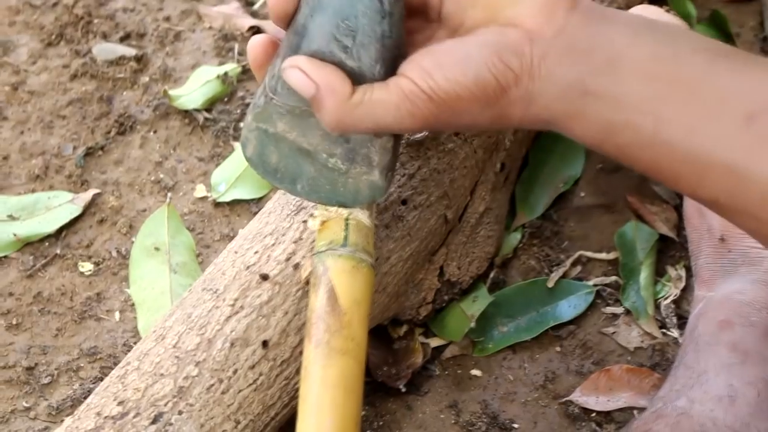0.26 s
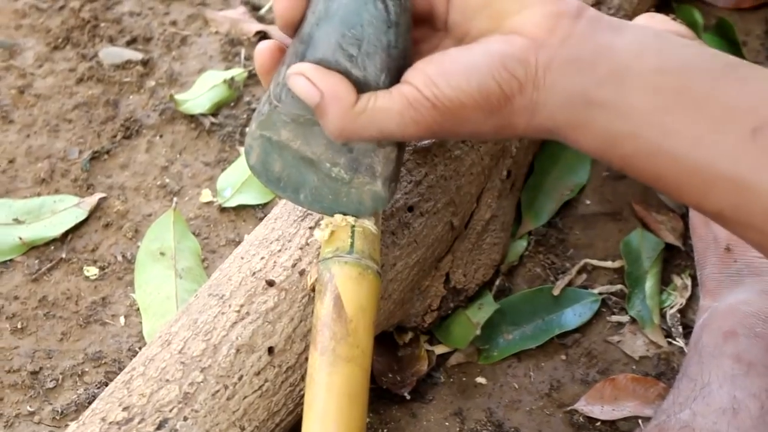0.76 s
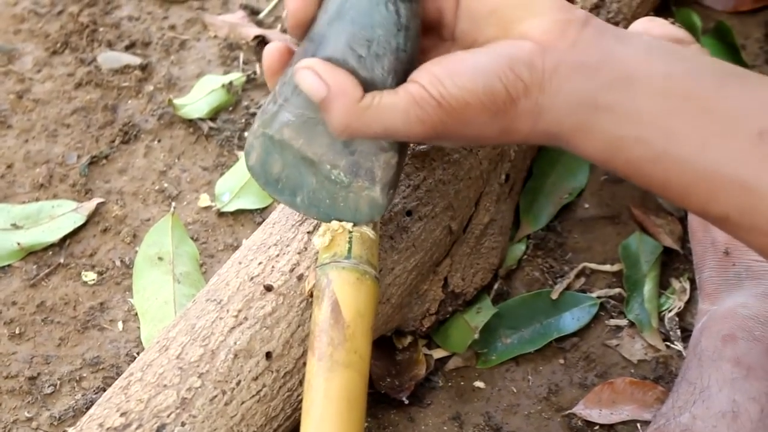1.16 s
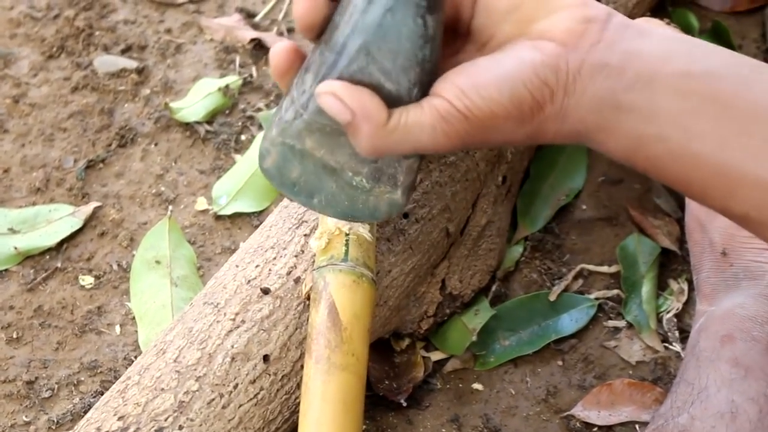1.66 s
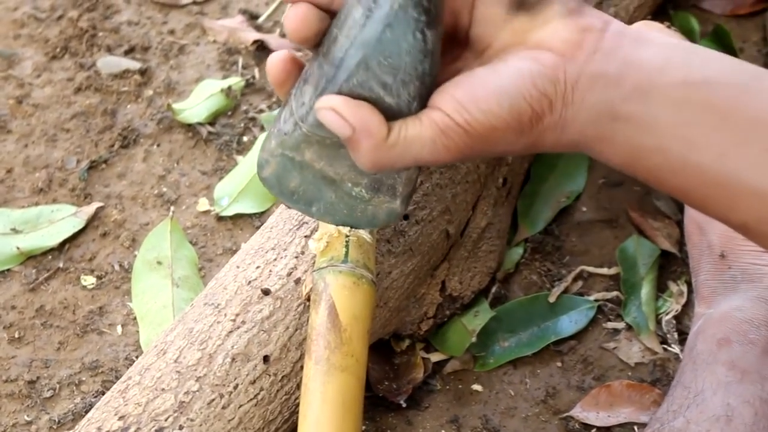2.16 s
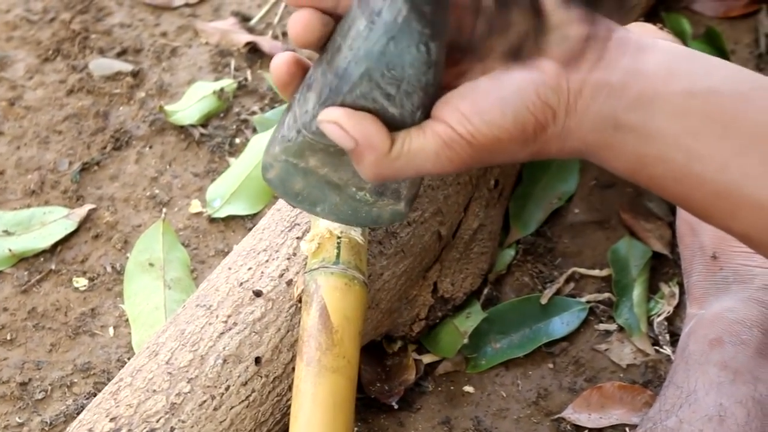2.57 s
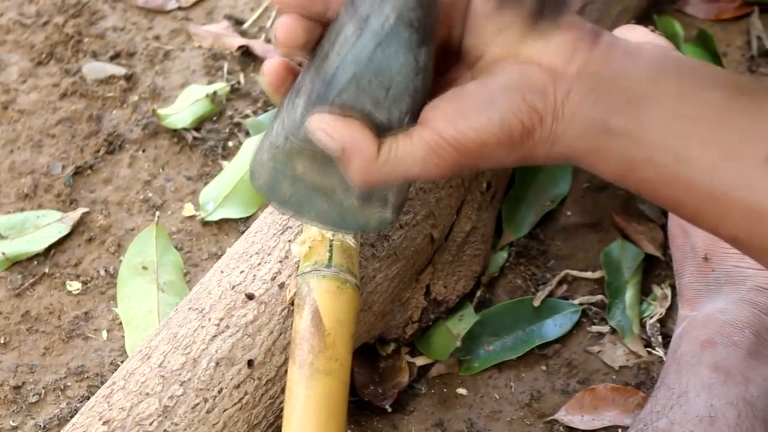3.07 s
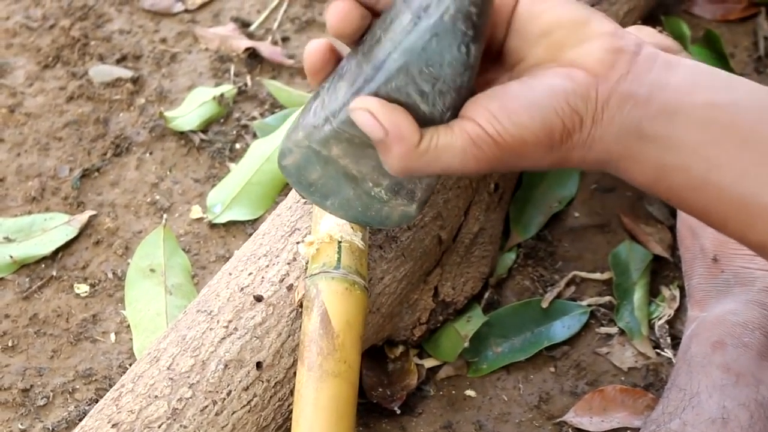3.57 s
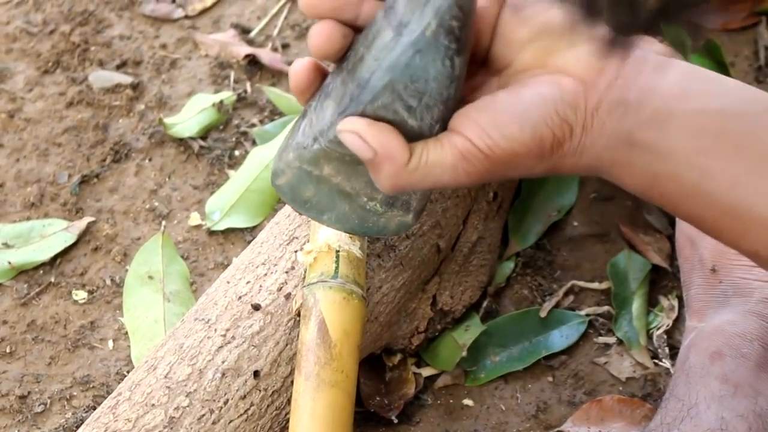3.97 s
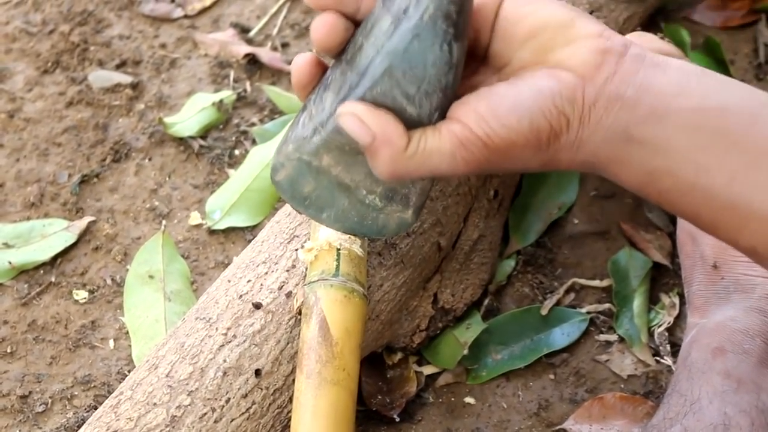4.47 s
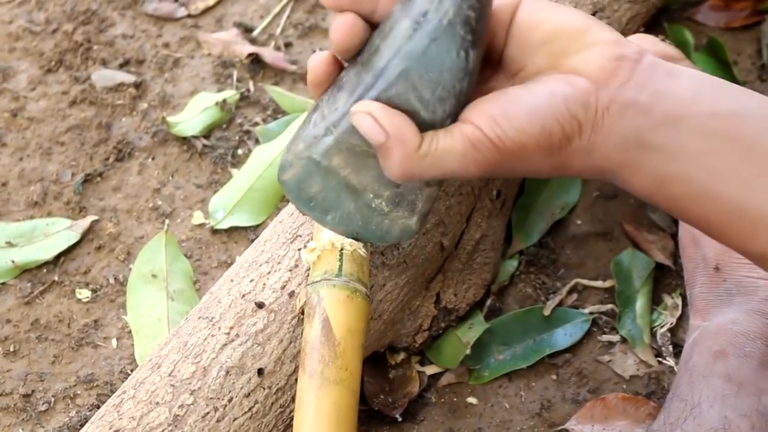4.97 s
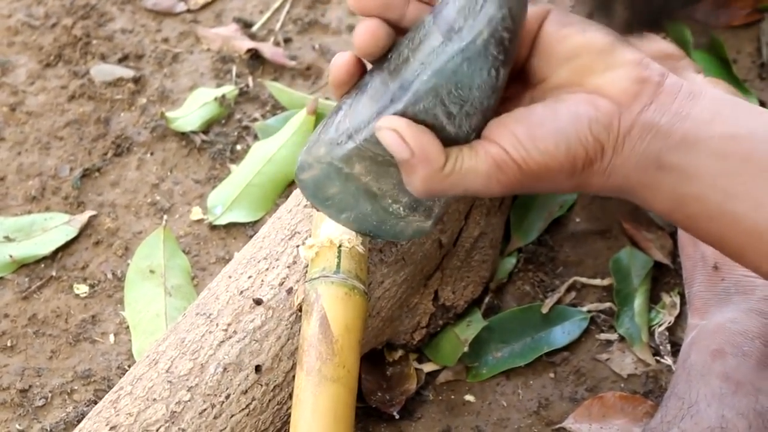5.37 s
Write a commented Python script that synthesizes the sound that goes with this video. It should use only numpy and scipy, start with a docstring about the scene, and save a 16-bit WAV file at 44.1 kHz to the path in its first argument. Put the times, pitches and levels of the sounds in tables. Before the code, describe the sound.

A close stereo outdoor scene in woodland. A steady shrill insect band around 6 kHz runs throughout over quiet rumbling, hissing air and a very faint distant engine throb, strongest near 3.8 s. A harsh bird chip drops in pitch at 0.1 s. A stone then strikes cane on a log at about 0.27, 0.68, 1.09, 1.94, 2.78, 3.16, 3.87, 4.27, 4.67 and 5.6 s. Each is a very short, dry thud and hollow clack with crunching fibres; the first three crack sharply, while the blow at 4.67 s has the strongest clack. Brief airy swishes lead into most blows, and ground and trees answer with a quick diffuse tail. A soft low bump follows at 3.22 s. Faint leaf rustles come between blows, tiny falling twitters are scattered from 2 to 4.8 s, and far arching whistles sound around 1.8 and 4.8 s.

```python
"""Throughout, insects drone as a shrill noise band, air rumbles and hisses, and a far engine throbs,
loudest after the middle. A bird chips first; then a stone knocks ten times on a cane lying on a log,
as damped modes and noise bursts. Most blows follow a short swish of resonant air, and the wood answers.
Between the blows leaves rustle, a far whistle arches up and down, and tiny falling notes twitter. Just
after the sixth blow comes one soft, low bump, as if the stone settles back; late on, a second whistle."""
import sys
import numpy as np
from scipy import signal
from scipy.fft import rfft, irfft
from scipy.io import wavfile
from scipy.ndimage import uniform_filter1d, minimum_filter1d

SR = 44100
rng = np.random.default_rng(int(sys.argv[2]) if len(sys.argv) > 2 else 0)


def store_wav(level_fs):
    """Save 16-bit WAV to argv[1]."""
    pcm = np.round(np.clip(np.atleast_2d(level_fs), -1, 1) * 32767)
    wavfile.write(sys.argv[1], SR, pcm.T.astype(np.int16))


N = 247401
TIME = np.arange(N) / SR

# Far engine: firings a second, level when nearest, time nearest, time from there to 3 dB down
ENGINE_RATE_HZ, ENGINE_DB, ENGINE_NEAR_S, ENGINE_PASS_S = 32.7, -60, 3.8, 1

# Spectrum of the still air: [frequency_hz, relative_db]
AIR_SPECTRUM = [(25, 0.5), (60, 3), (110, 1.5), (200, -2), (450, -6.5), (780, -4.5), (900, -8.5),
                (1500, -11.5), (3000, -14.5), (4300, -11.5), (7600, -20), (11000, -22.5), (16000, -32)]
AIR_DB = -53
# Likeness of left and right in diffuse sound: [frequency_hz, coherence (no unit)]
PORT_COHERENCE = [(60, 0.95), (300, 0.74), (700, 0.82), (1400, 0.54), (3100, 0.13), (7000, 0),
                  (15000, 0.16)]
# Faint rustles of leaves: [start_s, length_s, level_db before the fade in and out]
RUSTLES = [(0.774, 0.07, -56), (1.222, 0.058, -54.5), (1.475, 0.094, -56), (1.719, 0.093, -53),
           (3.672, 0.079, -54.5), (5.196, 0.084, -53.5)]
# Spectrum of a rustle: [frequency_hz, relative_db_per_hz]
LEAF_SPECTRUM = [(300, -15), (1500, -3), (4000, 11.5), (8000, 5.5), (15000, -27)]

# Spectrum of the insect chorus: [frequency_hz, relative_db_per_hz]
INSECT_SPECTRUM = [(3000, -34), (4900, -20.5), (5200, -8.5), (5450, 0.5), (5850, 4.5), (6100, 2),
                   (6400, -4.5), (6800, -12.5), (7300, -38.5), (10000, -31)]
INSECT_DB = -50.5  # before the gain of each side

# Bird levels are source levels, before the direct and scattered paths.
# The chip drops from a high pitch to a held low one and swells until it stops
CHIP_START_S, CHIP_DROP_S, CHIP_END_S, CHIP_FALL_S = .060, .090, 0.12, 0.0102
CHIP_HIGH_HZ, CHIP_LOW_HZ = 6650, 4300
CHIP_END_DB, CHIP_SWELL_DB_PER_S = -30, 170
# Far whistles, each an arch of pitch and level: [top_s, top_pitch_hz, top_level_db]
WHISTLES = [(1.815, 1129, -54.5), (4.835, 1200, -49.5)]
# Length, share of the top pitch lost at the ends, level of the ends against the top
WHISTLE_S, WHISTLE_SAG, WHISTLE_FADE_DB = .29, .18, -4
# Phrases of the twittering bird: [start_s, end_s]; an end before its start gives no notes
TWITTERS = [(2.04, 2.1), (2.303, 2.5), (2.554, 3.07), (2.834, 2.6), (3.026, 2.9), (3.294, 3.54),
            (3.683, 4.8), (3.929, 3.6), (4.451, 4.8)]
TWITTER_DB = -57.5  # typical note

# Spectrum of ground, leaves and trunk in reply: [frequency_hz, relative_db]
NEAR_SPECTRUM = [(50, -30), (150, 0), (300, 7), (600, 0), (1100, -2), (2200, -15), (4000, -21),
                 (16000, -45)]
# Spectrum of the whole wood in reply: [frequency_hz, relative_db]
WOOD_SPECTRUM = [(30, -22), (55, 2), (80, 8), (115, 4), (160, 1), (300, -0.5), (550, 3), (800, 0),
                 (1200, 0), (2200, -15.5), (3200, -18.5), (6000, -23.5), (11000, -29.5), (16000, -42)]
# Reverberation time of the wood: [frequency_hz, t60_s]
WOOD_DECAY = [(80, 0.25), (400, 0.19), (1200, 0.22), (4000, 0.42), (14000, 0.32)]
SCATTER_PER_THUD = 1.66  # dB of scatter per dB of thud

# Swings, each ending on the next blow:
# [start_s, loudest_s, level_db, lowest_resonance_gain_db, width_factor (no unit)]
SWINGS = [(0.217, 0.234, -32.5, 7.5, 0.8), (0.657, 0.676, -36.5, -13, 0.48), (1.062, 1.069, -53, -18, 0.47),
          (2.702, 2.772, -38.5, 5, 0.83), (3.119, 3.13, -30, 10, 0.55), (3.789, 3.838, -46, 6, 1.2),
          (4.213, 4.267, -43, 5.5, 1.38), (4.624, 4.671, -34, 11.5, 1.33), (5.533, 5.568, -45, 1, 1.2)]
# Resonances of the swish before each swing's changes: [frequency_hz, width_hz, relative_db]
SWISH_RESONANCES = [(1120, 340, -4.5), (2064, 510, -3), (3280, 1100, -7), (4500, 790, -13.5),
                    (8400, 6100, -14)]
SWISH_FADE_DB_PER_S, SWISH_SCATTER_DB = 457, -14

# The bump just after the sixth blow: onset, level before the soft rise, pitch, decay by 60 dB
BUMP_S, BUMP_DB, BUMP_HZ, BUMP_T60 = 3.222, -23, 420, 0.035

# Blows, levels before tilt and balance: [start_s, thud_db, clack_db, contact_crack_db, fibre_crunch_db,
# thud_pitch_factor (no unit), clack_pitch_factor (no unit), hardness_db_per_octave]
BLOWS = [(0.266, -0.5, -5, -11.5, -18.5, 1.07, 0.953, 7), (0.6842, 0.5, -1.5, -11, -12.5, .99, 1, 10.5),
         (1.0906, 0, -9, -7, -14.5, 0.96, 0.84, 6), (1.9430, -3, 1.5, -21, -19.5, 0.98, 0.99, -3.5),
         (2.7758, -3.5, -5.5, -34.5, -20, 0.99, 0.94, 4), (3.1551, 0, -1.5, -34, -15.5, .97, 0.916, 5.5),
         (3.8745, -3.5, -3, -51, -16, 0.96, 0.982, -6), (4.2700, 0, 4.5, -27, -11.5, .98, 0.97, -8.5),
         (4.6725, 1.5, 8, -22, -11.5, .98, 1.004, -6), (5.6050, -3.5, -0.5, -25, -16.5, 0.93, 0.96, -2)]
# Modes of the log, before pitch factor and tilt: [frequency_hz, level_db, t60_s]
LOG_MODES = [(217, -6.5, 0.026), (503, 0.5, 0.02), (262, -5, 0.017), (395.4, -17.5, 0.08), (592, -9, 0.018),
             (101.4, -23.5, 0.053)]
# Modes of the cane on it, before pitch factor and tilt: [frequency_hz, level_db, t60_s]
CANE_MODES = [(1135, -12.5, 0.018), (1301, -10.5, 0.039), (1450, -18, 0.018), (2124, -22.5, 0.026),
              (3170, -28.5, 0.01), (4400, -51, 0.0059), (1025, -23.5, 0.064), (736, -33.5, 0.1)]
# Spectrum of the contact's crack: [frequency_hz, relative_db_per_hz]
CRACK_SPECTRUM = [(200, -38), (800, 23), (1500, -23), (2100, 17), (2800, -49), (4400, -50), (5600, -19.5),
                  (7000, 4), (8200, -6), (9700, 4), (12000, -7), (16000, -24.5)]
# Spectrum of the splitting cane: [frequency_hz, relative_db_per_hz]
SPLIT_SPECTRUM = [(150, -30), (450, -55), (620, 19.5), (820, -39), (1050, 17), (1600, 7.5), (2100, -5),
                  (2700, -30), (5000, -41), (16000, -62)]
# Spectrum of the crunching fibres: [frequency_hz, relative_db_per_hz]
CRUNCH_SPECTRUM = [(200, -42), (500, 17), (1000, 18), (1800, 4), (2600, 1), (3200, 1.5), (4400, 1.5),
                   (6500, 3), (8200, -10), (10000, -15.5), (16000, -17)]

EDGE_HZ = 16100  # upper edge of the band kept


def amp(db):
    """Logarithmic level: decibels become a gain in amplitude."""
    return 10 ** (np.asarray(db) / 20)


def unit(x):
    """Mean power: scales a signal to rms 1."""
    return x / np.sqrt(np.mean(x ** 2) + 1e-20)


def read(points, hz):
    """Logarithmic pitch: reads a table between its points along a log-frequency axis."""
    f, value = np.transpose(points)
    return np.interp(np.log(hz + 1), np.log(f + 1), value)


def add(mix, s, sound):
    """Superposition: mixes a sound in at time s."""
    part = mix[..., max(round(s * SR), 0):][..., :sound.shape[-1]]
    part += sound[..., :part.shape[-1]]


def noise(spectrum, size):
    """Spectral shaping: white noise weighted by frequency, at rms 1."""
    white = rfft(rng.standard_normal(size))
    gain = amp(read(spectrum, np.fft.rfftfreq(size, 1 / SR)))
    return unit(irfft(white * gain, size))


def resonate(x, hz, width):
    """Resonance: two equal poles in a row select a band, which may follow a path of frequency."""
    turn = np.exp(2j * np.pi * np.cumsum(hz * np.ones(len(x))) / SR)
    r = np.exp(-np.pi * width / SR)
    # shift the band to zero frequency, filter it there and shift it back
    return (turn * signal.lfilter([(1 - r) ** 2], [1, -2 * r, r * r], x / turn)).real


def delayed(x, s):
    """Travel time: the same sound, s seconds later."""
    return np.interp(TIME - s, TIME, x, left=0)


def ports(a, b):
    """Diffuse-field coherence: two close ports hear much alike in the bass, less in the treble."""
    same = np.clip(read(PORT_COHERENCE, np.fft.rfftfreq(len(a), 1 / SR)), -1, 1)
    second = same * rfft(a) + np.sqrt(1 - same ** 2) * rfft(b)
    return np.array([a, irfft(second, len(a))])


def tail(decay, spectrum, rise):
    """Reverberation: a diffuse tail, scaled to energy 1 on the left, each band dying at its own rate."""
    size = SR // 2
    diffuse = ports(noise(spectrum, size), noise(spectrum, size))
    hz, at, bands = signal.stft(diffuse, SR, nperseg=256)
    bands = bands * amp(-60 * at / read(decay, hz)[:, None])
    both = signal.istft(bands, SR, nperseg=256)[1][:, :size]
    both = both * (1 - np.exp(-(TIME[:size] / rise) ** 2))
    return both / np.linalg.norm(both[0])


def engine(pipe_hz=460, width_hz=130, puff=0.34):
    """Pulse excitation: firings puff through one exhaust resonance; amplitude falls as 1 / distance."""
    turns = ENGINE_RATE_HZ * TIME
    puffs = np.exp(-(turns % 1) / puff) * rng.standard_normal(N)  # puff is a share of the firing period
    pulses = np.diff(np.floor(turns), prepend=0)
    exhaust = unit(resonate(unit(pulses) + 0.07 * unit(puffs), pipe_hz, width_hz))
    distance = np.hypot(1, (TIME - ENGINE_NEAR_S) / ENGINE_PASS_S)  # steady speed, nearest distance 1
    return amp(ENGINE_DB) / distance * exhaust


def air():
    """Diffuse noise: low rumble and soft hiss, with brief swells of brighter noise for the leaves."""
    balance = amp([[.7], [-.7]])
    out = amp(AIR_DB) * ports(noise(AIR_SPECTRUM, N), noise(AIR_SPECTRUM, N)) * balance
    for s, length, db in RUSTLES:
        size = round(length * SR)
        rustle = ports(noise(LEAF_SPECTRUM, size), noise(LEAF_SPECTRUM, size))
        add(out, s, amp(db) * np.hanning(size) * rustle)
    return out


def insects(opposed=0.22, left_db=5.5, right_db=4.0):
    """Incoherent sum: many insects merge into one noise band, partly in opposite phase at the ports."""
    a, b = noise(INSECT_SPECTRUM, N), noise(INSECT_SPECTRUM, N)
    left = amp(left_db) * a
    right = amp(right_db) * (np.sqrt(1 - opposed ** 2) * b - opposed * a)
    return amp(INSECT_DB) * np.array([left, right])


def note(hz, db, rough, width_hz):
    """Frequency modulation: a tone follows a path of pitch and level; roughness frays it into a band."""
    pure = np.sin(2 * np.pi * np.cumsum(hz) / SR)
    frayed = unit(resonate(rng.standard_normal(len(hz)), hz, width_hz))
    tone = (1 - rough) * pure + rough * frayed
    return amp(db) * tone * signal.windows.tukey(len(hz), .2)


def whistles():
    """Parabolic glide: far whistles rise, level off and sink again in pitch and level."""
    t, out = np.arange(-WHISTLE_S / 2, WHISTLE_S / 2, 1 / SR), np.zeros(N)
    off_top = (2 * t / WHISTLE_S) ** 2
    for s, hz, db in WHISTLES:
        pitch = hz * (1 - WHISTLE_SAG * off_top)
        add(out, s + t[0], note(pitch, db + WHISTLE_FADE_DB * off_top, rough=.35, width_hz=90))
    return out


def twitters(top_hz=4550, bottom_hz=3950, uneven_db=1.5, gap_s=.042, note_s=.028):
    """Repeated downward glides: runs of tiny notes, a little uneven in time, pitch and level."""
    out, fall = np.zeros(N), np.linspace(top_hz, bottom_hz, round(note_s * SR))
    for start, end in TWITTERS:
        for s in np.arange(start, end, gap_s):
            late_s, shift = rng.uniform(0, .014), rng.uniform(.97, 1.03)
            db = TWITTER_DB + uneven_db * rng.standard_normal()
            add(out, s + late_s, note(fall * shift, db, rough=0.48, width_hz=130))
    return out


def chip():
    """Downward glide: one harsh call drops quickly in pitch and swells on its low note."""
    t, out = np.arange(CHIP_START_S, CHIP_END_S, 1 / SR), np.zeros(N)
    still_high = (1 - np.tanh((t - CHIP_DROP_S) / CHIP_FALL_S)) / 2
    hz = CHIP_LOW_HZ + (CHIP_HIGH_HZ - CHIP_LOW_HZ) * still_high
    db = CHIP_END_DB + CHIP_SWELL_DB_PER_S * (t - CHIP_END_S)
    add(out, CHIP_START_S, note(hz, db, rough=0.62, width_hz=520))
    return out


def birds(whistle_wet_db=-9, chip_direct_db=-8.0):
    """Direct and scattered paths: three birds are each heard straight and blurred by the trees."""
    near, far, tiny = chip(), whistles(), twitters()
    trees = tail([(1000, 0.76), (5000, 0.51)], [(1000, 0), (5000, -1.4)], rise=0.0096)
    to_trees = near + amp(whistle_wet_db) * far + tiny
    direct = amp(chip_direct_db) * near + .5 * far + tiny
    return direct + signal.fftconvolve(to_trees[None], trees, axes=1)[:, :N]


def scatter(near_db=3.0, near_t60=0.056, wood_db=0.5, trunk_s=0.056, trunk_db=-15.5):
    """Scattering: ground and leaves at hand, a trunk further off and the whole wood return each blow."""
    out, quick = np.zeros((2, N)), [(100, near_t60), (16000, near_t60)]
    for s, thud_db, *_ in BLOWS:
        db = SCATTER_PER_THUD * thud_db
        add(out, s, amp(db + near_db) * tail(quick, NEAR_SPECTRUM, rise=0.013))
        add(out, s + trunk_s, amp(db + trunk_db) * tail(quick, NEAR_SPECTRUM, rise=0.0023))
        add(out, s, amp(db + wood_db) * tail(WOOD_DECAY, WOOD_SPECTRUM, rise=0.0097))
    return out


def swishes(glide=0.145, glide_s=0.011, clean=0.77):
    """Aeroacoustic resonance: air rushes through a few bands; the lowest rises with the speed."""
    out = np.zeros(N)
    for start, top, db, low_db, breadth in SWINGS:
        blow_s = min(s for s, *_ in BLOWS if s > start)
        t = np.arange(start, blow_s, 1 / SR)
        rush = np.zeros(len(t))
        pure = np.clip(clean - breadth ** 2, 0, 1)  # a narrow swish whistles, a broad one hisses
        for k, (hz, width, mode_db) in enumerate(SWISH_RESONANCES):
            path = hz * (1 + glide * np.tanh((t - top) / glide_s) * (k == 0))
            level = amp(mode_db + low_db * (k == 0)) * (breadth if k > 1 else 1)
            band = unit(resonate(rng.standard_normal(len(t)), path, width * breadth))
            tone = np.sin(2 * np.pi * np.cumsum(path) / SR)
            share = pure * (k < 2)  # only the two lowest can whistle
            rush += level * unit((1 - share) * band + share * tone)
        swell = np.interp(t, [start, top], [0, 1]) ** 1.04
        fade = amp(-SWISH_FADE_DB_PER_S * np.maximum(t - top, 0))
        add(out, start, amp(db) * unit(rush) * swell * fade)
    trees = tail([(1000, 0.52), (8000, 0.34)], [(300, -3), (2000, 1), (16000, -4)], rise=0.016)
    scattered = signal.fftconvolve(out[None], trees, axes=1)[:, :N]
    return out * amp([[.8], [-.8]]) + amp(SWISH_SCATTER_DB) * scattered


def bump():
    """Damped oscillation: one soft, low knock, as if the stone settles back on the cane."""
    t, out = TIME[:4096], np.zeros(N)
    soft_onset = 1 - np.exp(-t / 0.0012)
    decay = amp(BUMP_DB - 60 * t / BUMP_T60)
    add(out, BUMP_S, decay * soft_onset * np.sin(2 * np.pi * BUMP_HZ * t))
    return out


def ring(modes, t, pitch, tilt_db):
    """Modal superposition: damped modes of alternating sign; a hard contact favours the high ones."""
    pivot = modes[0][0]
    out = np.zeros(len(t))
    for k, (hz, db, t60) in enumerate(modes):
        level = amp(db + tilt_db * np.log2(hz / pivot) - 60 * t / t60)
        out += (-1) ** k * level * np.sin(2 * np.pi * hz * pitch * t)
    return out


def knocks(crack_s=0.0011, crunch_s=0.0012, echo_s=0.003457, echo=0.51, treble_echo=0.028,
           grain=0.37, log_tilt=0.12, split_db=-3, split_s=0.0017):
    """Impact: a blow rings log and cane; the contact cracks, fibres crunch as the stone sinks in."""
    size = 4096
    t = TIME[:size]
    body, grit = np.zeros((2, N)), np.zeros((2, N))
    for s, thud_db, clack_db, crack_db, crunch_db, log_pitch, cane_pitch, hard_db in BLOWS:
        log_hard_db = log_tilt * hard_db  # the log feels little of the hardness
        thud = amp(thud_db - log_hard_db) * ring(LOG_MODES, t, log_pitch, log_hard_db)
        clack = amp(clack_db) * ring(CANE_MODES, t, cane_pitch, hard_db)
        add(body, s, thud * amp([[.5], [-.5]]) - clack * amp([[1.1], [-1.1]]))
        # a sharp contact also sets the cane splitting, a rough burst in the mids
        burst = (t / split_s) * np.exp(1 - t / split_s)
        split = amp(crack_db + split_db) * burst * noise(SPLIT_SPECTRUM, size)
        add(body, s, split * amp([[1.1], [-1.1]]))
        snap = amp(crack_db) * np.exp(-t / crack_s)
        # the crunch swells with the force and comes in clumps
        uneven = unit(uniform_filter1d(rng.standard_normal(size), size=12))
        clumps = unit(np.exp(grain * uneven))
        force = (t / crunch_s / 2) ** 2 * np.exp(2 - t / crunch_s)
        crush = amp(crunch_db) * force * clumps
        middle, other = (snap * noise(CRACK_SPECTRUM, size) + crush * noise(CRUNCH_SPECTRUM, size)
                         for _ in range(2))
        side = 0.74 * np.gradient(other)  # the ports differ more the higher the pitch
        add(grit, s, np.array([middle + side, middle - side]) * amp([[1.7], [-1.7]]))
    # a hard surface close by throws each blow back at once
    reflected = echo * body + treble_echo * grit
    return body + grit + np.array([delayed(x, echo_s) for x in reflected])


def scene():
    """Superposition: the far sounds of the wood under the near blows and their scatter."""
    background = engine() + air() + insects() + birds()
    return background + scatter() + swishes() + bump() + knocks()


def record(dry, low_cut_hz=58, rumble_cut_hz=48, threshold_db=-19, slope=0.36, recovery_db_per_s=140):
    """Dynamic compression: bass cut, gain dips above a threshold, peak limiter, then band limits."""
    dry = signal.sosfilt(signal.butter(2, low_cut_hz, "high", fs=SR, output="sos"), dry)
    power = signal.lfilter([.004], [1, -.996], (dry ** 2).mean(0))
    power_db = 10 * np.log10(power + 1e-12)
    # the held level falls back at a steady rate after each peak
    fall = TIME * recovery_db_per_s
    held_db = np.maximum.accumulate(power_db + fall) - fall
    over_db = np.maximum(held_db - threshold_db, 0)
    lag = np.exp(-1 / (0.0055 * SR))  # the gain follows with a lag of 5.5 ms
    ducked = dry * amp(-slope * signal.lfilter([1 - lag], [1, -lag], over_db))
    # a quick limiter holds the peaks near full scale
    room = minimum_filter1d(1 / np.maximum(abs(ducked).max(0), 1), size=129)
    limited = ducked * uniform_filter1d(room, size=129)
    limited = signal.sosfilt(signal.butter(2, rumble_cut_hz, "high", fs=SR, output="sos"), limited)
    low_pass = signal.firwin(511, EDGE_HZ, window=("kaiser", 9), fs=SR)
    return signal.oaconvolve(limited, low_pass[None], "same")


dry = scene()
out = record(dry)
store_wav(out)
```